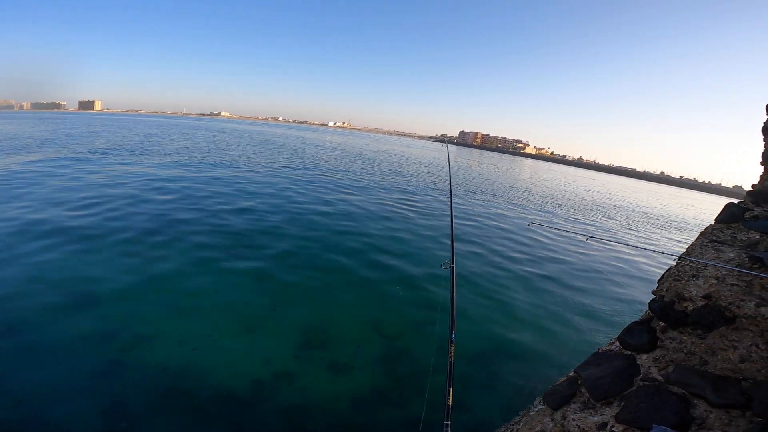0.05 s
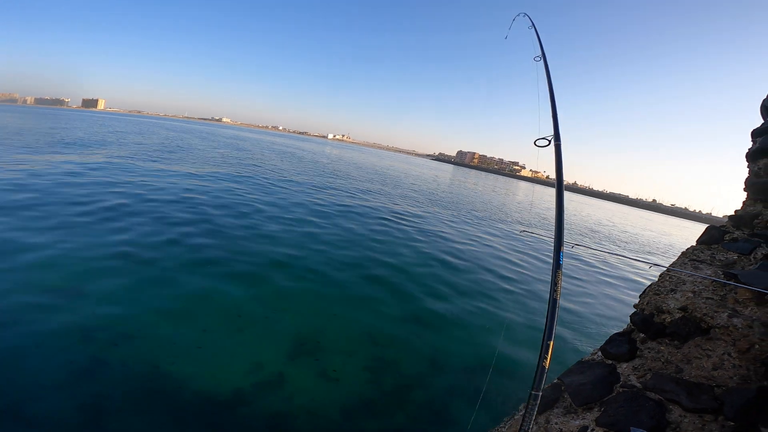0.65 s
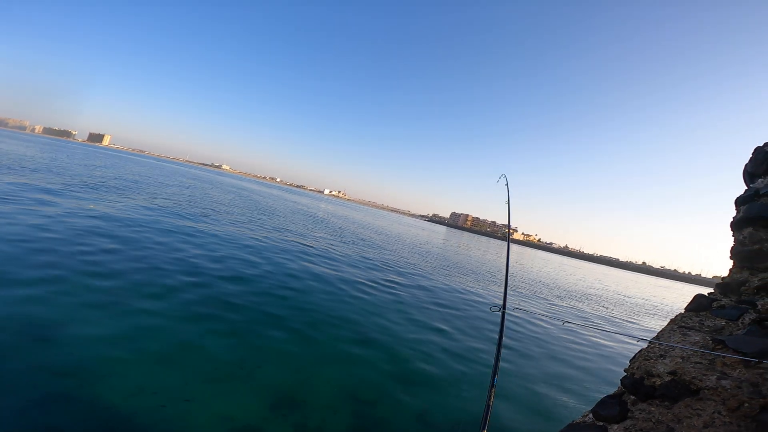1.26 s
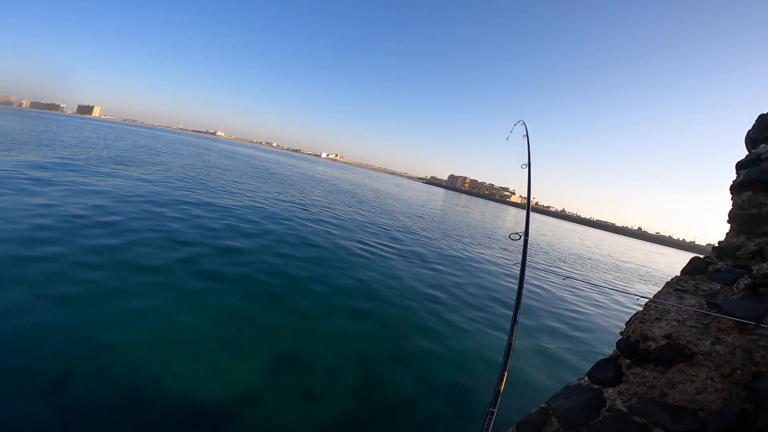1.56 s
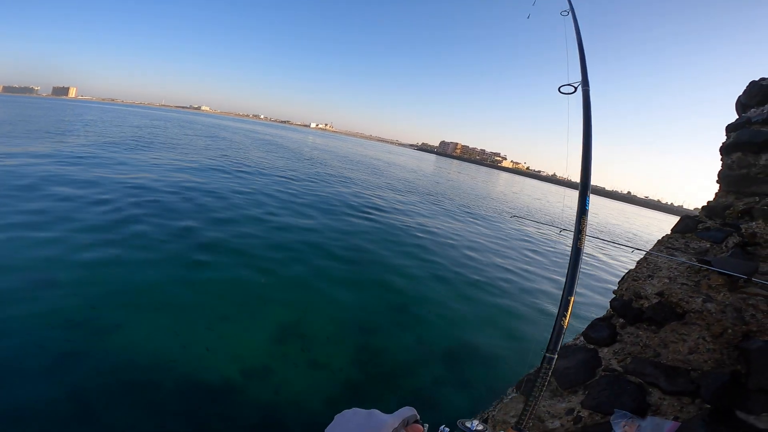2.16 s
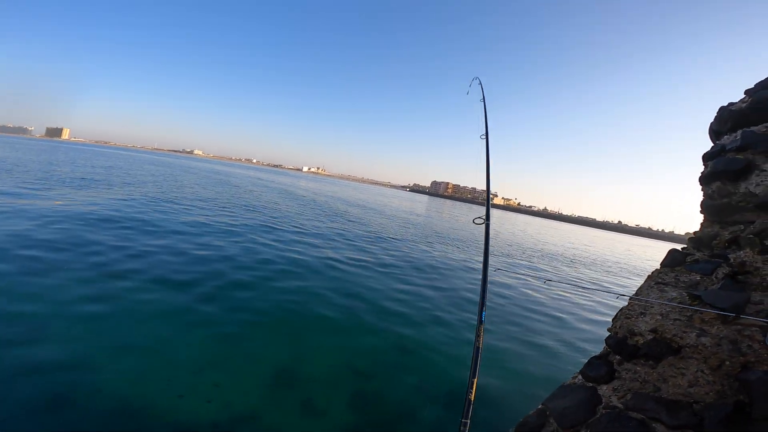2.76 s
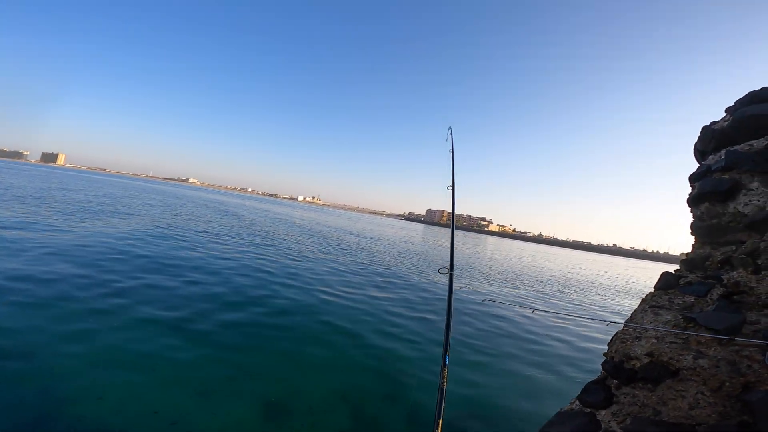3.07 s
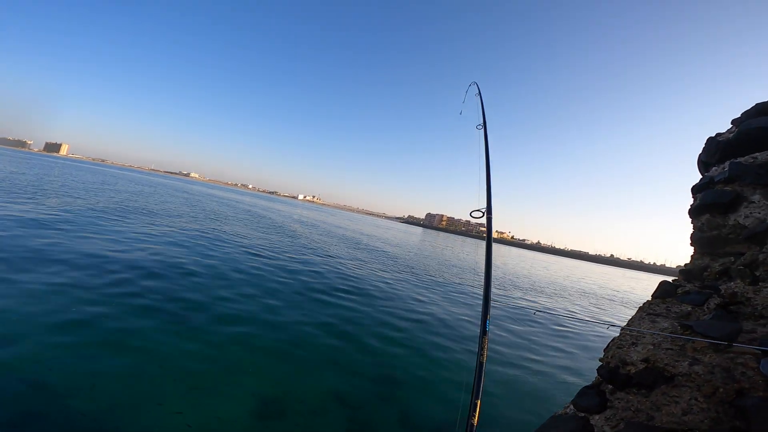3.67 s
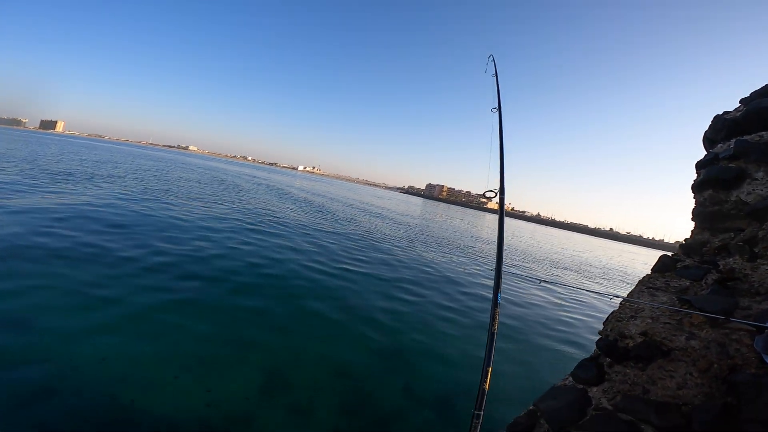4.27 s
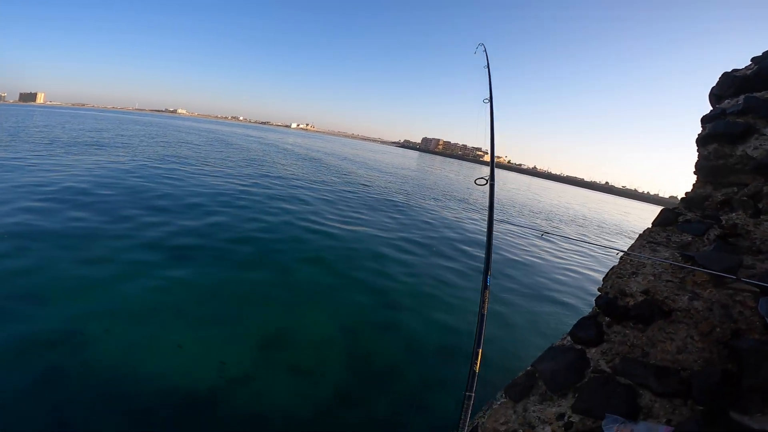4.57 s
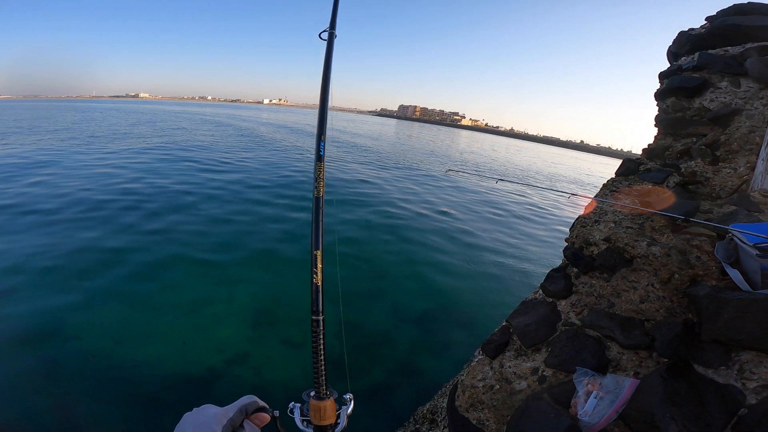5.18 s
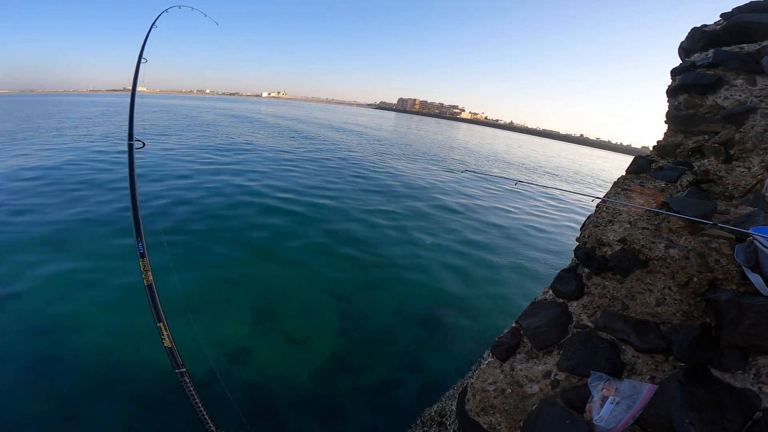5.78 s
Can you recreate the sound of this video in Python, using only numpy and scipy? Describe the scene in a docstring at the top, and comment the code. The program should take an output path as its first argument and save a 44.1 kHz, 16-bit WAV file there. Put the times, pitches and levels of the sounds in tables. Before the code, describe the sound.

Outdoors on a pier, small waves wash gently over stones below, dripping, gurgling and sometimes thumping softly against the wall. A low engine hum fades early over the steady rumble of faraway engines. Scattered metallic ticks come from a fishing reel near the microphone. The water grows busier in the second half as light wind gusts rumble on the microphone, then the reel gives a few quick clacks.

```python
"""Angling from a rocky pier

Calm sea laps at the wall below: a fizz of tiny bubbles, droplets, small slaps and dull thumps.
Close by, metal on the fishing reel ticks and rings, and its mechanism clacks near the end.
Engines rumble far off; a nearer one hums up and fades early. A breeze buffets the microphone
of a small camera, whose right port is muffled and hollow."""
import sys
import numpy as np
from scipy import signal
from scipy.fft import rfft, irfft
from scipy.io import wavfile

SR = 44100
rng = np.random.default_rng(int(sys.argv[2]) if len(sys.argv) > 2 else 0)


def transcribe(u):
    """Save the signal u as a 16-bit wav file named by the first command-line argument.

    u: samples, shape (n,) or (channels, n), limited to [-1, 1]; the rate is SR.
    q: integer samples, one column per channel.
    """
    v = np.clip(np.atleast_2d(u).T, -1, 1)
    q = np.round(v * 32767).astype(np.int16)
    wavfile.write(sys.argv[1], SR, q)


N = 261513
T = np.arange(N) / SR
FREQS = np.maximum(np.arange(N // 2 + 1) * SR / N, 1)

# murmur of sea and shore, all around: freq_hz, gain_db
SEA_SPECTRUM = [(25, 9.5), (60, 7), (120, 1.5), (200, 1.5), (320, -7), (500, -13), (900, -14), (1500, -20),
                (3000, -39.5), (8000, -42), (12000, -46)]
# breeze on the microphone: freq_hz, gain_db
WIND_SPECTRUM = [(12, -4), (25, 0.5), (45, 3), (75, -7.5), (130, -16), (300, -35), (1000, -65.5)]
# its gusts: peak_s, level_db, fall_s
WIND_GUSTS = [(1.2, -30.5, 0.14), (1.79, -26, 0.049), (2.6, -35, 1), (3.95, -37, 0.13), (4.28, -25, 0.52),
              (4.78, -24.5, 0.18), (5.87, -24.5, 0.18)]
# engines across the bay: pitch_hz, width_hz, gain_db
DRONE_BANDS = [(68.7, 12, -1.5), (99.1, 3.76, -2.5), (114.9, 10.5, -1), (144.4, 19, -8.5),
               (168.4, 21.4, -8), (279, 53, -18), (931, 14, -26)]
# the nearer engine: time_s, pitch_hz, fundamental_db, octave_db
ENGINE_HUM = [(0, 83, -31.5, -71), (.12, 87.6, -33, -36.5), (.24, 97.7, -28, -43), (.33, 99.6, -58, -48.5),
              (.52, 93, -44, -38), (.7, 96.5, -74, -67), (1.0, 95, -54, -55), (1.4, 97.2, -58, -72)]

# thumps from the side of the wall: start_s, push_db, push_hz, ring_db, ring_hz
WALL_THUMPS = [(1.736, -22, 110.3, -34.5, 193), (1.762, -31.5, 85.3, -35.5, 255.4),
               (2.026, -37.5, 119, -48, 312), (2.276, -43.5, 96, -46, 290),
               (3.909, -37.5, 67.2, -39.5, 270), (3.975, -29.5, 119.4, -34.5, 306),
               (4.207, -36.5, 106, -39.5, 251), (4.244, -28.5, 87, -35.5, 327),
               (4.454, -33.5, 98.4, -37.5, 258), (4.519, -29.5, 98, -30.5, 305),
               (4.7, -26.5, 105.5, -40.5, 232), (4.733, -30, 95, -35.5, 294),
               (4.805, -38, 83.7, -38.5, 249), (5.805, -25, 83.3, -48, 199.4)]
# churning after a thump: freq_hz, gain_db
CHURN_SPECTRUM = [(60, -1.5), (160, 5.5), (400, -2.5), (540, -12), (1000, -31)]

# clacks of the turning reel: start_s, level_db
REEL_CLACKS = [(5.327, -35.5), (5.405, -37.5), (5.459, -29), (5.646, -40)]
# resonances of its housing: pitch_hz, width_hz, gain_db
HOUSING_BANDS = [(1540, 240, -3.5), (3130, 200, -8), (4470, 640, -10.5), (5700, 270, -8)]
# bright edge of a clack: freq_hz, gain_db
CLACK_SPECTRUM = [(4000, -23), (10000, -1), (12500, -.5)]
# ticks of loose metal on the reel: start_s, level_db, low_ring_gain_db, overtone_gain_db
REEL_TICKS = [(0.4589, -26.5, -11.5, -11), (1.688, -28, 2.5, 1), (1.9768, -24.5, 1, -9.5),
              (2.503, -26, 2, 3), (3.3516, -27.5, 0, 4), (3.389, -30, -6, 0), (3.486, -30, 5.5, 7.5),
              (3.517, -30.5, -8.5, 2), (3.541, -26.5, -20, -2.5), (3.57, -27.5, -14, -2),
              (4.811, -32, 10, 10)]
# modes of that metal: pitch_hz, gain_db, t60_s
REEL_MODES = [(3835, -17, 0.28), (7550, -28.5, 0.12), (5140, -5.5, 0.02), (4720, -26.5, 0.044),
              (6600, -23.5, .012), (2410, -12, 0.0099), (11600, -25, .07), (12050, -25, .09),
              (12500, -25.5, .1), (12800, -32, .1), (13150, -25, .1)]
# contact noise of a tick: freq_hz, gain_db
TICK_SPECTRUM = [(1500, -15.5), (5000, -12), (9500, -10), (12500, 2)]

# nearest droplets and bursting bubbles: start_s, level_db, pitch_hz, ring_cycles
NEAR_DROPS = [(.039, -25, 3960, 4), (.091, -36.5, 4180, 9.1), (0.161, -28, 2550, 4.9),
              (.193, -33.5, 3790, 4), (0.266, -39.5, 4170, 5.7), (0.3968, -35.5, 3920, 3.4),
              (0.4142, -36, 5020, 5.6), (.894, -23.5, 2780, 3), (1.293, -36, 3980, 4.1),
              (1.3584, -29.5, 3750, 3.9), (1.424, -36.5, 4520, 4.9), (1.490, -27.5, 2820, 3),
              (1.5177, -27.5, 3725, 1.9), (1.644, -34, 3900, 4.8), (1.786, -27, 3900, 1.2),
              (1.8003, -37, 4200, 3), (1.9383, -35.5, 6500, 2.4), (1.9446, -28, 3810, 3.6),
              (1.953, -31, 2730, 2.9), (2.0793, -35.5, 4200, 7), (2.1541, -38, 3660, 12),
              (2.183, -34.5, 3750, 2.3), (2.2605, -30, 3870, 1.7), (2.2698, -35, 3550, 1.7),
              (2.338, -36, 2840, 2.9), (2.3926, -42, 3790, 4.1), (2.463, -32, 3560, 4.3),
              (2.8606, -30, 3490, 2.1), (2.986, -37, 3860, 7), (3.061, -28.5, 3960, 2.9),
              (3.1198, -31, 4470, 10), (3.187, -32.5, 4250, 15), (3.232, -31, 4090, 2.9),
              (3.2403, -17.5, 4350, 2), (3.2583, -33, 4500, 4), (3.2615, -31, 3920, 2.6),
              (3.2734, -29, 3850, 4.8), (3.3101, -33, 4600, 4.2), (3.3117, -13.5, 4500, 0.8),
              (3.5235, -20.5, 5200, 1), (3.6065, -15, 5400, 1.14), (3.673, -35.5, 4410, 12),
              (3.684, -31, 4690, 3), (3.7002, -28.5, 4200, 1.4), (3.778, -26.5, 3470, 0.97),
              (3.911, -37, 3740, 3.3), (3.931, -39.5, 4200, 7.2), (3.9924, -34, 4220, 12),
              (4.0387, -36.5, 4560, 2.1), (4.1367, -33, 3500, 3.9), (4.152, -35, 4200, 4),
              (4.3075, -36.5, 3980, 7.7), (4.372, -28, 4390, 1.7), (4.4416, -29.5, 3550, 4),
              (4.4453, -29, 3500, 5.1), (4.47, -30, 4860, 5.5), (4.4915, -27, 3520, 2.8),
              (4.5632, -31, 5560, 4.2), (4.595, -26, 3840, 2.6), (4.6517, -24.5, 4120, 3.9),
              (4.7516, -27.5, 4000, 2.4), (4.764, -32, 4610, 4), (4.7865, -30, 3270, 2),
              (4.7678, -21, 3470, 1.3), (4.7841, -26, 4940, 2.3), (4.8257, -39, 3810, 4.8),
              (4.8352, -27.5, 5600, 4.7), (4.8446, -14.5, 2750, 2.5), (4.8616, -16, 1850, 2.4),
              (4.8235, -31, 4920, 4), (4.862, -27, 2260, 3.2), (4.8715, -38, 2450, 2.6),
              (4.8755, -30.5, 4020, 4.5), (4.8845, -29, 2700, 3.6), (4.915, -29.5, 3600, 4.4),
              (4.8933, -31, 3120, 2.3), (4.9126, -22, 4700, 1.1), (4.9235, -21, 5200, 1.2),
              (4.926, -32.5, 3980, 2.2), (5.0125, -40, 3850, 3.5), (5.042, -38, 6300, 5),
              (5.046, -28.5, 4300, 1.9), (5.081, -34, 5300, 1.1), (5.124, -35, 4270, 9.2),
              (5.132, -25, 5440, 1.3), (5.1685, -23, 3420, 1.8), (5.2117, -26.5, 4450, 2.2),
              (5.2125, -38, 5900, 5), (5.2424, -28, 4000, 6), (5.765, -32.5, 4140, 5.2),
              (5.8215, -27.5, 3700, 0.98), (5.843, -23.5, 4740, 1.8)]
# large bubbles surfacing: start_s, level_db, pitch_hz, ring_cycles, glide_ratio
BUBBLE_CHIRPS = [(1.01, -36.5, 1517, 5.8, .02), (1.281, -42, 2010, 9, 0.035),
                 (1.612, -30, 1600, 2.9, 0.0086), (1.678, -39, 1033, 5, 0.075),
                 (1.693, -33.5, 1580, 12, 0.067), (1.751, -43, 225, 8.8, .036),
                 (2.393, -41.5, 1220, 6.7, 0.025), (2.6248, -33, 1283, 4.2, .005),
                 (2.625, -37, 646, 2, -0.0019), (2.649, -34.5, 1332, 14, 0.017),
                 (2.696, -34, 1620, 7.6, .005), (2.792, -45.5, 966, 10, -0.018),
                 (2.841, -33, 1860, 6, -.005), (3.296, -36.5, 2340, 14, -0.0078),
                 (3.545, -37.5, 1650, 11, 0.11), (3.559, -38.5, 2880, 10, 0.015),
                 (3.589, -36.5, 1820, 7, 0.037), (3.607, -31, 2240, 4.5, -0.02),
                 (3.663, -42.5, 479, 8.1, 0.015), (4.343, -38, 1240, 10, 0.037),
                 (4.398, -37.5, 1430, 8, .01), (4.565, -33.5, 1710, 7, -.01), (4.624, -31, 2090, 6, 0.015),
                 (4.655, -42.5, 822, 5.5, .036), (4.713, -36.5, 1550, 7, 0.037), (4.79, -33, 2720, 7, .08),
                 (4.828, -30, 3200, 5, 0.047), (4.868, -33.5, 703, 3, .036), (5.098, -31, 1590, 7.9, .025),
                 (5.157, -30, 1380, 4, 0.013), (5.179, -35, 1396, 3, .02)]
# small slaps on the rock: start_s, level_db, decay_s, air_pocket_hz
ROCK_SLAPS = [(2.661, -35, 0.01, 2540), (3.1452, -33, 0.0095, 3990), (4.644, -28, 0.0072, 2080),
              (4.6855, -35.5, 0.009, 1083), (4.808, -27.5, 0.0058, 1397), (4.881, -30, 0.0049, 3370)]
# sheet of water thrown by a slap: freq_hz, gain_db
SHEET_SPECTRUM = [(300, -24), (1500, 10), (4500, 1.5), (9000, -14), (12000, -17)]
# resonances of the crevices: pitch_hz, width_hz, gain_db
CREVICE_BANDS = [(830, 96, -6.5), (1380, 740, -10.5), (1970, 490, 8), (4460, 880, 2), (5600, 370, -4.5)]
# fuller wavelets folding into the stones: peak_s, level_db, fall_s
STONE_SLOSHES = [(2.685, -40, 0.036), (2.81, -46, 0.11), (4.4, -43, 0.065), (4.66, -48, 0.046),
                 (4.87, -47, .04)]
# their bubble cloud: freq_hz, gain_db
GUSH_SPECTRUM = [(400, -4), (800, -2.5), (1500, 4), (2000, 2.5), (3000, -3)]
# wavelets reaching the wall: crest_s, wash_db, fizz_db, drain_s
WAVELETS = [(0.028, -47, -46.5, 0.22), (.42, -55.5, -54, 0.92), (0.918, -50, -47.5, 0.12),
            (1.22, -48, -49, 0.27), (1.64, -48.5, -47, 0.23), (2.671, -41, -44.5, 0.12),
            (2.858, -45, -73.5, 0.15), (3.222, -46, -44.5, 0.69), (4.2, -46.5, -50.5, 0.23),
            (4.462, -43.5, -42, 0.069), (4.661, -44, -43.5, 0.38), (4.849, -42.5, -39, 0.059),
            (5.18, -49.5, -65, 0.37), (5.422, -47, -50.5, 0.27), (5.661, -45, -44.5, 0.085),
            (5.9, -43.5, -45.5, 0.15)]
# coarse bubbles over the stones: freq_hz, gain_db
WASH_SPECTRUM = [(200, -5.5), (420, -12.5), (800, 2), (1400, 7.5), (2200, 9.5), (3200, 8.5), (5000, -1),
                 (9000, -24.5), (12000, -33)]
# fine bubbles left behind: freq_hz, gain_db
FIZZ_SPECTRUM = [(1200, -37.5), (2600, -3), (3900, 8), (5000, 2.5), (6500, -4), (9000, -2.5), (11000, -12)]

# response shared by both microphone ports: freq_hz, gain_db
PORT_RESPONSE = [(20, 2.5), (3000, -1), (4000, 6), (5000, 1.5), (6200, 3), (7200, -5.5), (8000, -17),
                 (8900, -35), (10500, -40), (12600, -27), (14000, -51.5)]
# added colour of the right port: freq_hz, gain_db
RIGHT_RESPONSE = [(100, -0.5), (320, 0.5), (520, 3), (720, 3), (945, 13.5), (1080, 3), (1265, 13),
                  (1480, 2.5), (2100, -5), (3300, -9), (4100, -15), (5100, -29.5), (7200, -18.5),
                  (13000, -16.5)]
# delay from its resonances: freq_hz, lag_rad
RIGHT_PHASE = [(30, 0), (500, -.15), (720, .6), (940, 2), (1260, 3.1), (1480, 4), (2100, 4.7)]


def undb(db):
    """Decibels to gain."""
    return 10 ** (np.asarray(db) / 20)


def unit(x):
    """Scale to rms 1."""
    return x / np.sqrt(np.mean(x ** 2))


def spectrum(table):
    """Join (freq_hz, value) points along log frequency."""
    hz, value = np.transpose(table)
    return np.interp(np.log(FREQS), np.log(hz), value)


def colour(x, table):
    """Filter by (freq_hz, gain_db) points and scale to rms 1."""
    return unit(irfft(rfft(x) * undb(spectrum(table)), N))


def resonate(x, bands):
    """Sum steep (pitch_hz, width_hz, gain_db) band-passes of x and scale to rms 1."""
    response = sum(undb(db) / (1 + 1j * (FREQS ** 2 - hz ** 2) / (FREQS * width * np.sqrt(2))) ** 2
                   for hz, width, db in bands)
    return unit(irfft(rfft(x) * response, N))


def noise(apart):
    """Noise at both ports; apart is the share of power that each has for itself."""
    both, *own = rng.standard_normal((3, N))
    return np.sqrt(1 - apart) * both + np.sqrt(apart) * np.array(own)


def walk(rate_hz):
    """Smooth random drift with rms 1."""
    return unit(irfft(rfft(rng.standard_normal(N)) / (1 + (FREQS / rate_hz) ** 4), N))


def add(out, s, sound):
    """Mix a sound in at time s."""
    i = max(int(s * SR), 0)
    part = sound[:max(N - i, 0)]
    out[i:i + len(part)] += part


def burst(s, decay_s, rise_s):
    """Envelope that swells quickly at time s and dies away."""
    age = np.maximum(T - s, 0)
    return (1 - np.exp(-age / rise_s)) * np.exp(-age / decay_s)


def swells(rows, rest_db, rise_share):
    """Level in dB of (peak_s, level_db, fall_s) swells; each builds in a share of its fall time."""
    power = undb(rest_db) ** 2
    for s, db, fall_s in rows:
        away = np.maximum((s - T) / rise_share, T - s) / fall_s
        power = power + (undb(db) * np.exp(-away)) ** 2
    return 10 * np.log10(power)


def open_air():
    """Sea and shore murmur all around; gusts hit the right port harder than the sheltered left."""
    apart = FREQS ** 2 / (FREQS ** 2 + 740 ** 2)  # above 740 Hz each port hears its own murmur
    shared = rfft(noise(apart=.018)) * np.sqrt(1 - apart)
    diffuse = rfft(noise(apart=1)) * np.sqrt(apart)
    sea = colour(irfft(shared + diffuse, N), SEA_SPECTRUM) * undb(-42 + .5 * walk(.58))
    gust_db = swells(WIND_GUSTS, rest_db=-55.5, rise_share=.75)
    sheltered_db = .44 * gust_db + .45 * np.mean(gust_db) - 14.5
    wind = colour(noise(apart=.51), WIND_SPECTRUM)
    return sea + wind * undb(np.array([sheltered_db, gust_db]) + walk(5.8))


def engines():
    """Far engines drone steadily across the bay; a nearer one speeds up and fades."""
    drone = sum(undb(db) * resonate(noise(apart=.025), [(hz, width, 0)])
                for hz, width, db in DRONE_BANDS)
    times, *columns = np.transpose(ENGINE_HUM)
    hz, fundamental_db, octave_db = (np.interp(T, times, column) for column in columns)
    phase = 2 * np.pi * np.cumsum(hz * (1 + .017 * walk(11))) / SR
    hum = undb(fundamental_db) * np.sin(phase) + undb(octave_db) * np.sin(2 * phase)
    return unit(drone) * undb(-39 - .16 * walk(.63)) + undb(-1.5) * hum


def wall_thumps(ring_lag_s=.009, right_bias_db=16.5):
    """From the wall on the right: a short deep push, then a rough hollow ring that rises."""
    out = np.zeros(N)
    for s, push_db, push_hz, ring_db, ring_hz in WALL_THUMPS:
        add(out, s, undb(push_db) * bubble(push_hz, cycles=.79, glide=0))
        add(out, s + ring_lag_s, undb(ring_db) * plop(ring_hz, cycles=2.5, glide=.031))
    churn = colour(rng.standard_normal(N), CHURN_SPECTRUM)
    out += churn * sum(undb(ring_db - 7.5) * burst(s + ring_lag_s, decay_s=.027, rise_s=.0026)
                       for s, _, _, ring_db, _ in WALL_THUMPS)
    return out * undb(np.array([[-1], [1]]) * right_bias_db / 2)


def reel_winding():
    """Close by, the turning mechanism clacks in its housing and whirs faintly after each clack."""
    housing = resonate(rng.standard_normal(N), HOUSING_BANDS)
    edge = colour(rng.standard_normal(N), CLACK_SPECTRUM)
    force = np.zeros(N)
    for s, db in REEL_CLACKS:
        clack = burst(s, decay_s=.0055, rise_s=.00011)
        whir = burst(s, decay_s=.067, rise_s=.00089)
        force += undb(db) * (clack + undb(-15.5) * whir)
    return (housing + undb(-7) * edge) * force


def reel_ticks():
    """Close by, one loose metal part snaps and buzzes, with a low ring and jingling overtones."""
    out, t = np.zeros(N), T[:SR // 2]
    waver = 1 + .12 * (walk(70) + 1j * walk(70))  # the rattling part shakes its own ring
    for s, db, low_db, overtone_db in REEL_TICKS:
        for hz, mode_db, t60 in REEL_MODES:
            free_db = overtone_db if hz > 7000 else low_db if t60 > .1 else 0  # how freely it rings
            shaken = np.roll(waver, rng.integers(N))[:len(t)]
            ring = np.imag(shaken * np.exp(2j * np.pi * hz * t))
            add(out, s, undb(db + mode_db + free_db) * ring * np.exp(-np.log(1000) * t / t60))
    contact = colour(rng.standard_normal(N), TICK_SPECTRUM)
    snaps = sum(undb(db) * burst(s, decay_s=.0015, rise_s=.0002) for s, db, *_ in REEL_TICKS)
    buzz = sum(undb(db + overtone_db) * burst(s, decay_s=.018, rise_s=.001)
               for s, db, _, overtone_db in REEL_TICKS)
    return out + contact * (undb(7) * snaps + undb(-18) * buzz)


def bubble(hz, cycles, glide):
    """A pocket of air swells into ringing and dies within some cycles while its pitch slides."""
    peak_s = max(cycles, .5) / hz / 2
    age = T[:int(9 * peak_s * SR) + 2] / peak_s
    return age * np.exp(1 - age) * np.sin(2 * np.pi * hz * peak_s * age * (1 + glide * age))


def plop(hz, cycles, glide, rough=.4):
    """A large bubble wobbles in strength as it rings."""
    ring = bubble(hz, cycles, glide)
    wobble = np.interp(T[:len(ring)] * hz / 2, np.arange(256), rng.standard_normal(256))
    return ring * (1 + rough * wobble) / np.sqrt(1 + rough ** 2)


def droplet(hz, cycles, fall=.21):
    """A droplet snaps high and its pitch falls while it rings out."""
    peak_s = max(cycles, .5) / hz / 2
    age = T[:int(9 * peak_s * SR) + 2] / peak_s
    pitch_hz = hz * ((1 + age) / 2.34) ** -fall
    return (age * np.exp(1 - age)) ** 1.3 * np.sin(2 * np.pi * np.cumsum(pitch_hz) / SR)


def swarm(per_s, low_hz, high_hz, spread_db, cycles, glide=-.0087):
    """Many tiny bubbles, mostly faint, a few strong; some snap, some ring."""
    out = np.zeros(N)
    for when, pitch, faintness, ring in rng.random((12000, 4))[:int(per_s * N / SR)]:
        strength = undb(-spread_db * np.log(max(faintness, .015)))
        hz = low_hz * (high_hz / low_hz) ** pitch
        add(out, when * N / SR, strength * bubble(hz, cycles * 2 ** (2 * ring - 1), glide))
    return out


def rock_wall(x, t60_s, wet_db):
    """The rough wall scatters a short tail back to both ports."""
    t = T[:SR // 4]
    tail = rng.standard_normal((2, len(t))) * np.exp(-np.log(1000) * t / t60_s) * (t > .002)
    tail /= np.sqrt(np.sum(tail ** 2, axis=1, keepdims=True))
    return x + undb(wet_db) * signal.fftconvolve(x[None], tail, axes=1)[:, :N]


def droplets(fizz_db):
    """Near droplets snap, large bubbles chirp as they surface, and faint stray drops follow the fizz."""
    strays = swarm(per_s=36, low_hz=2680, high_hz=5800, spread_db=2.5, cycles=4.5, glide=-.02)
    out = undb(fizz_db - 5.5) * strays
    for s, db, hz, cycles in NEAR_DROPS:
        add(out, s, undb(db) * droplet(hz, cycles))
    for s, db, hz, cycles, glide in BUBBLE_CHIRPS:
        add(out, s, undb(db) * plop(hz, cycles, glide))
    return out


def slaps():
    """A crest meets the rock, throws a spray of beads, rings the crevices and traps a pocket of air."""
    beads = swarm(per_s=2000, low_hz=1600, high_hz=6700, spread_db=.5, cycles=2)
    sheet = colour(rng.standard_normal(N), SHEET_SPECTRUM)
    spray = unit(unit(beads) + sheet)
    crevices = resonate(rng.standard_normal(N), CREVICE_BANDS)
    force, pockets = np.zeros((2, N))
    for s, db, decay_s, pocket_hz in ROCK_SLAPS:
        crack = undb(-1) * burst(s, decay_s=.0011, rise_s=.00013)  # first contact
        force += undb(db) * (crack + burst(s, decay_s, rise_s=.00017))
        add(pockets, s, undb(db) * bubble(pocket_hz, cycles=6, glide=0))
    return (undb(-5) * spray + undb(-5.5) * crevices) * force + pockets


def slosh():
    """A fuller wavelet folds into the stones and churns up a bubble cloud; a few ring on and gurgle."""
    cloud = sum(swarm(per_s=1900, low_hz=400, high_hz=3000, spread_db=.2, cycles=5) for _ in range(2))
    gush = colour(cloud, GUSH_SPECTRUM)
    gurgle = unit(swarm(per_s=130, low_hz=950, high_hz=1750, spread_db=1.5, cycles=9, glide=.01))
    return unit(gush + undb(-4) * gurgle) * undb(swells(STONE_SLOSHES, rest_db=-75, rise_share=.43))


def lap_levels():
    """Wash and fizz in dB: both build to each crest and drain away to a trickle."""
    crest_s, wash_db, fizz_db, drain_s = np.transpose(WAVELETS)
    return (swells(zip(crest_s, wash_db, drain_s), rest_db=-56.5, rise_share=.81),
            swells(zip(crest_s, fizz_db, drain_s), rest_db=-59, rise_share=.94))


def lapping(wash_db, fizz_db):
    """Below the microphone, wavelets wash over the stones in coarse bubbles and leave a fine fizz."""
    coarse = swarm(per_s=1800, low_hz=400.5, high_hz=3395, spread_db=3.5, cycles=3)
    fine = swarm(per_s=1300, low_hz=2400, high_hz=7800, spread_db=2.6, cycles=2.2)
    wash = colour(coarse, WASH_SPECTRUM) + undb(-4) * colour(noise(apart=1), WASH_SPECTRUM)
    fizz = colour(fine, FIZZ_SPECTRUM) + undb(-10) * colour(noise(apart=.99), FIZZ_SPECTRUM)
    surge_db = walk(9.9)  # the trickle swells and ebbs
    return (wash * undb(wash_db - 3.5) + fizz * undb(fizz_db - 4)) * undb(surge_db)


def scene():
    """From the pier: water below, reel in hand, engines far off."""
    wash_db, fizz_db = lap_levels()
    water = lapping(wash_db, fizz_db) + slosh()
    water += rock_wall(droplets(fizz_db) + slaps(), t60_s=.06, wet_db=-13)
    return water + reel_ticks() + reel_winding() + wall_thumps() + engines() + open_air()


def record(dry):
    """Both microphone ports dull the top treble; the right is muffled, honks near 1 kHz and lags."""
    fade = np.minimum(1, np.minimum(T, T[-1] - T) / .004)
    left, right = rfft(dry * fade) * undb(spectrum(PORT_RESPONSE))
    right = right * undb(spectrum(RIGHT_RESPONSE)) * np.exp(-1j * spectrum(RIGHT_PHASE))
    low_pass = signal.ellip(8, .2, 70, 13600, fs=SR, output="sos")
    return signal.sosfilt(low_pass, irfft(np.array([left, right]), N))


dry = scene()
out = record(dry)
transcribe(out)
```